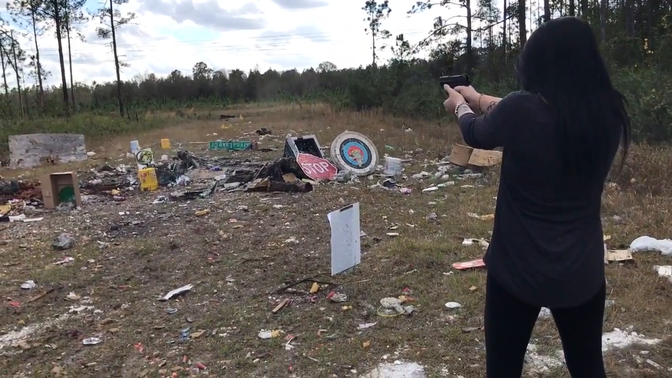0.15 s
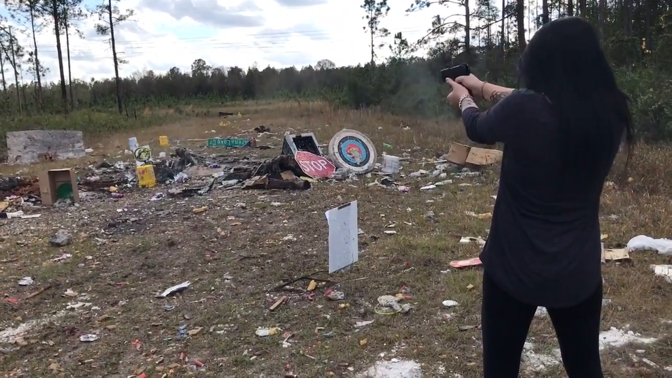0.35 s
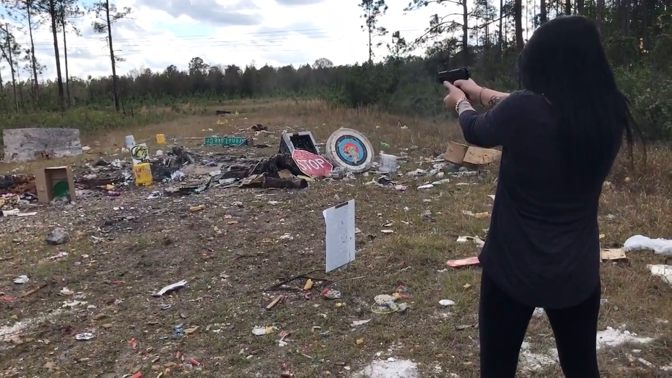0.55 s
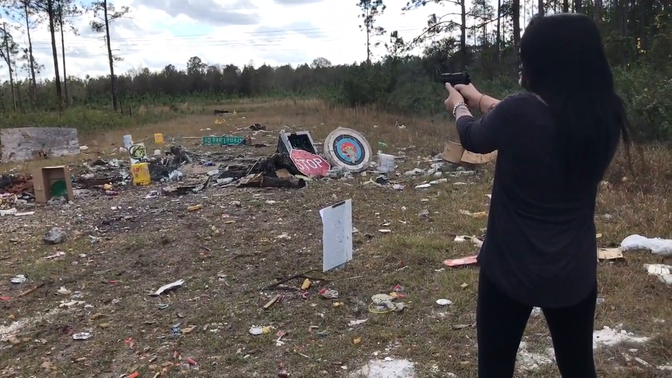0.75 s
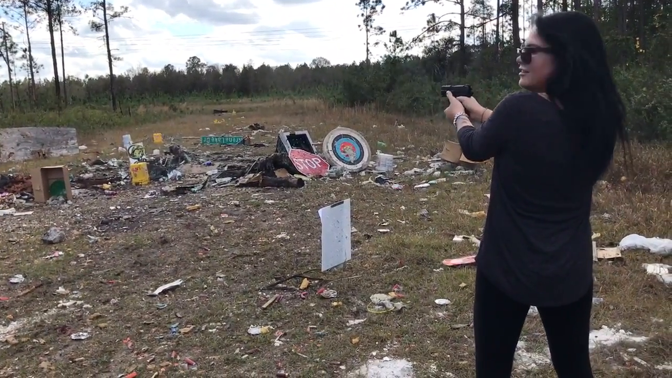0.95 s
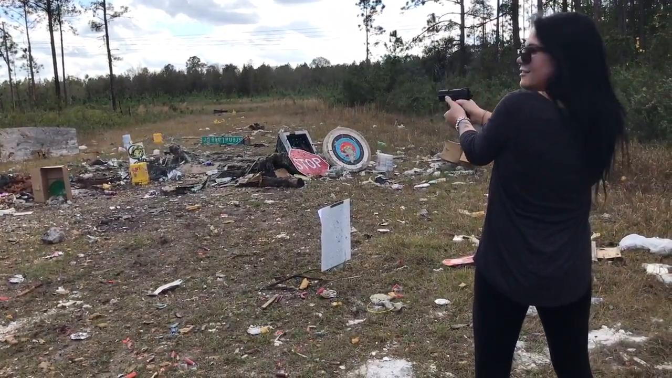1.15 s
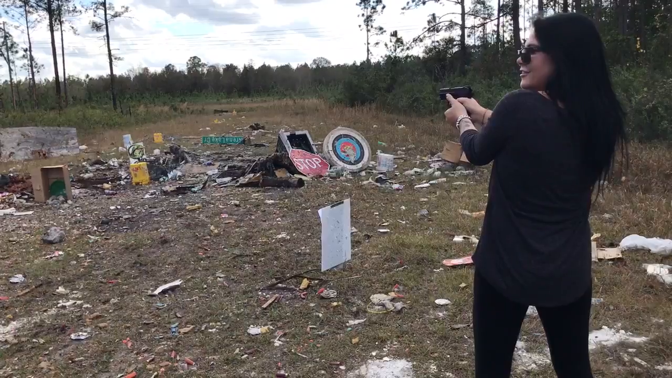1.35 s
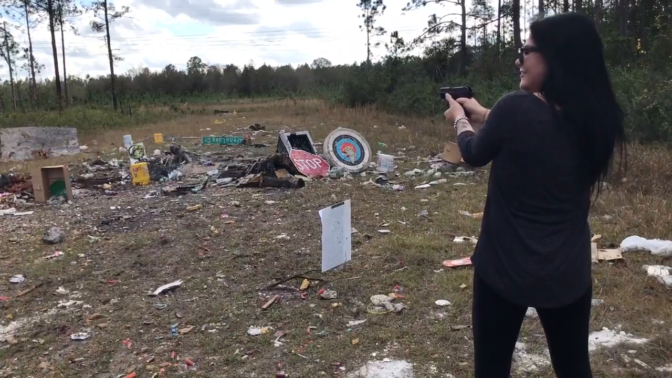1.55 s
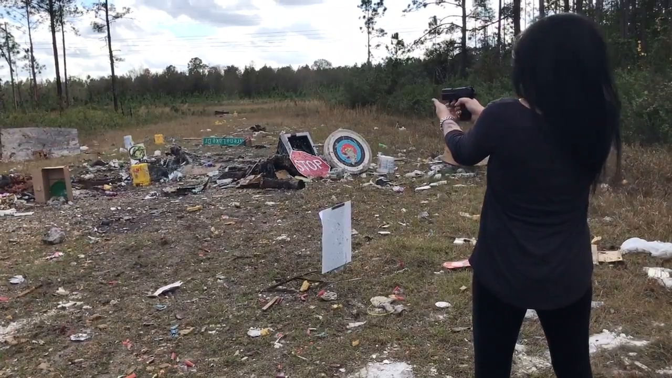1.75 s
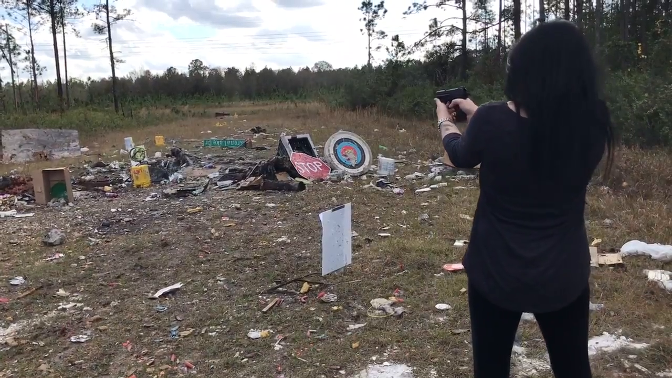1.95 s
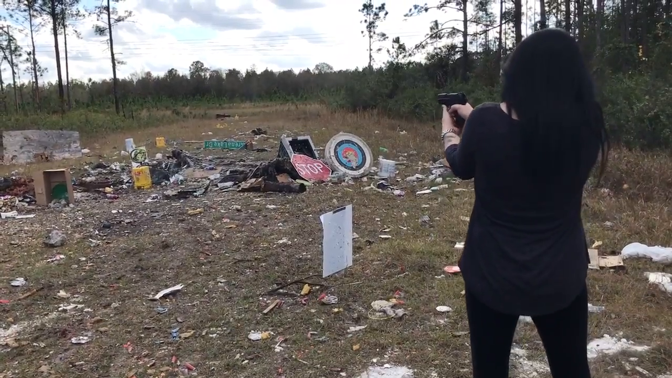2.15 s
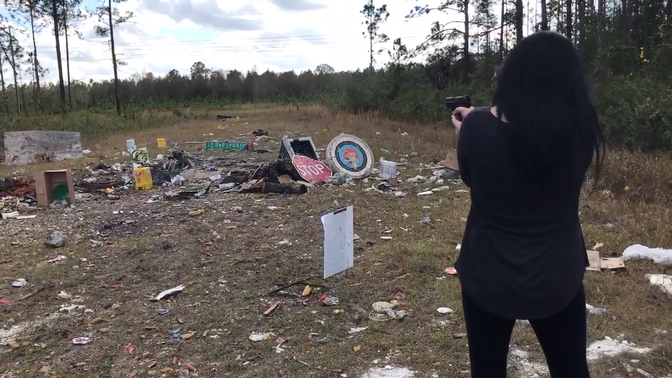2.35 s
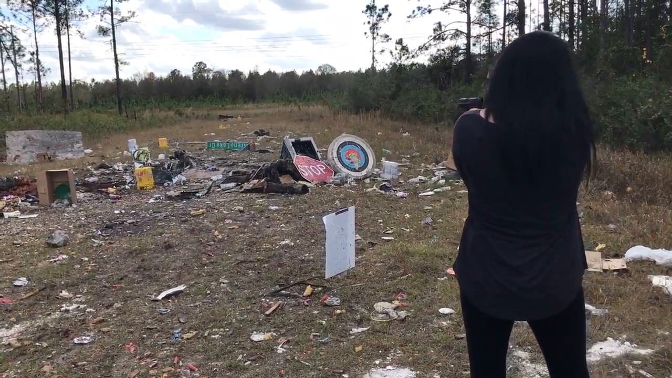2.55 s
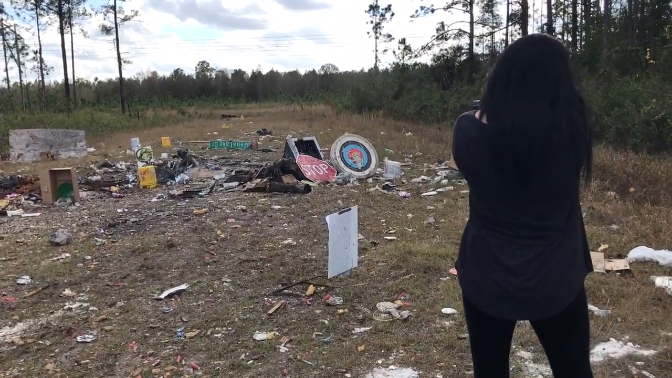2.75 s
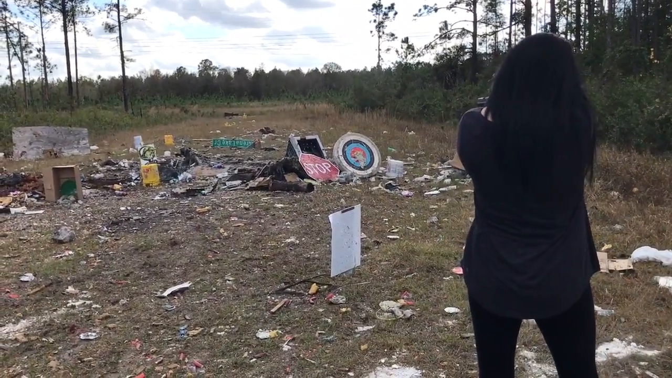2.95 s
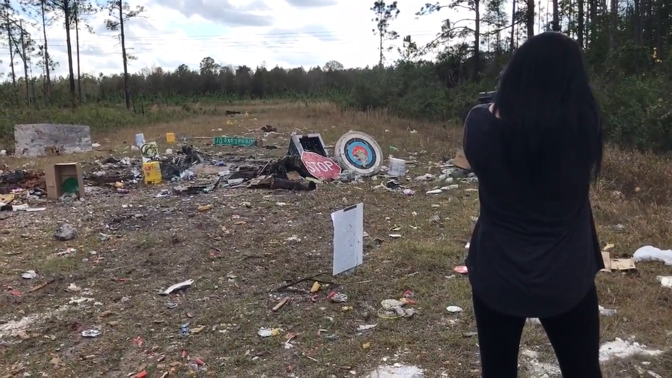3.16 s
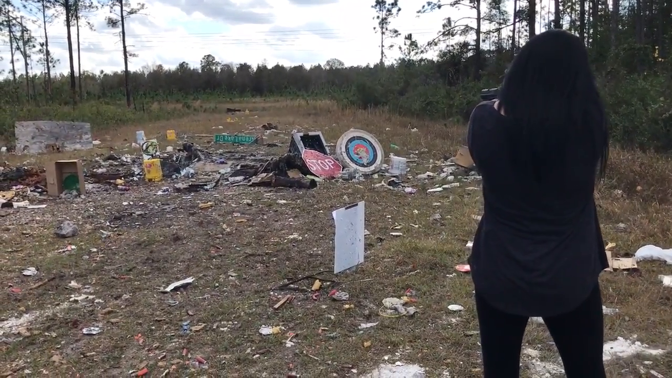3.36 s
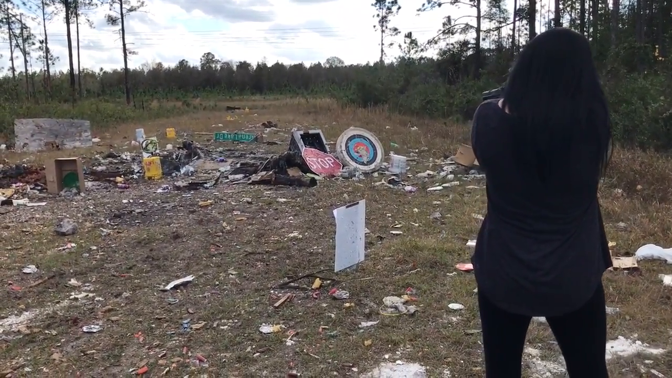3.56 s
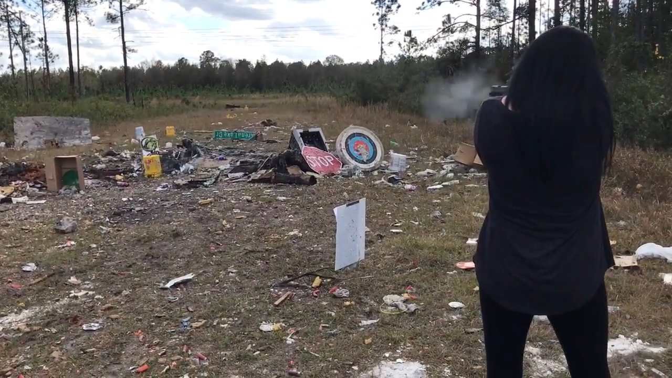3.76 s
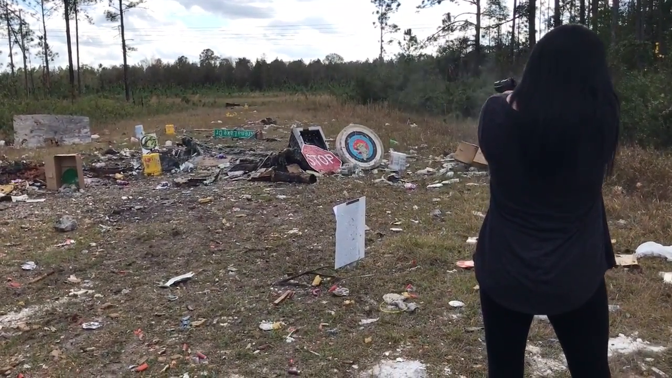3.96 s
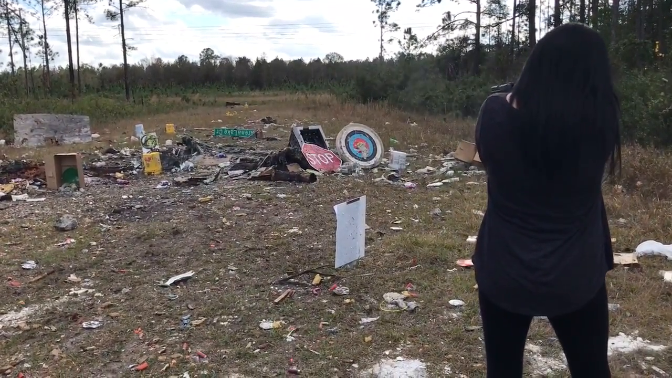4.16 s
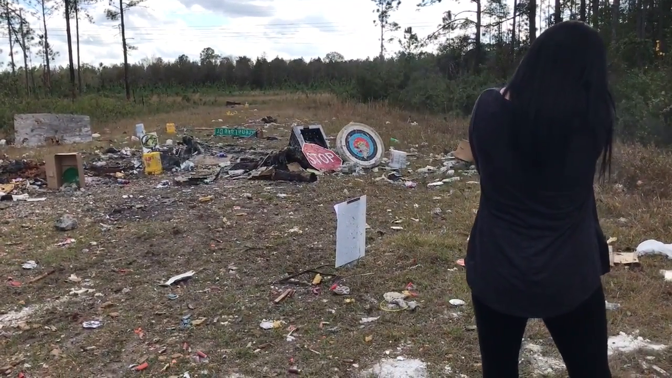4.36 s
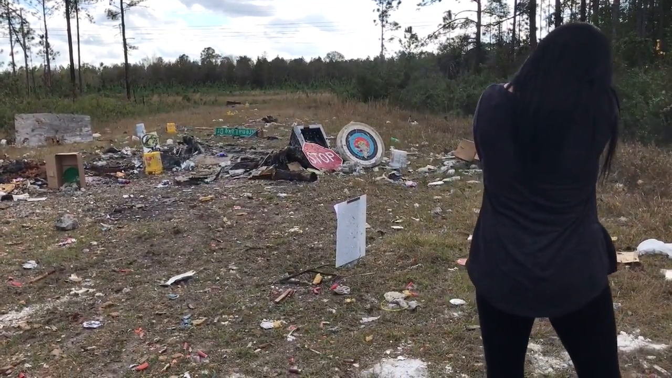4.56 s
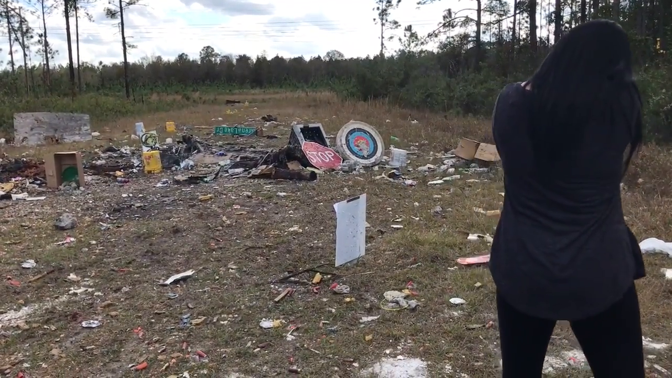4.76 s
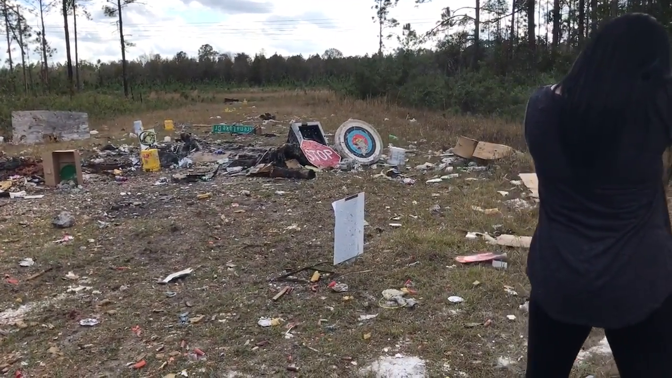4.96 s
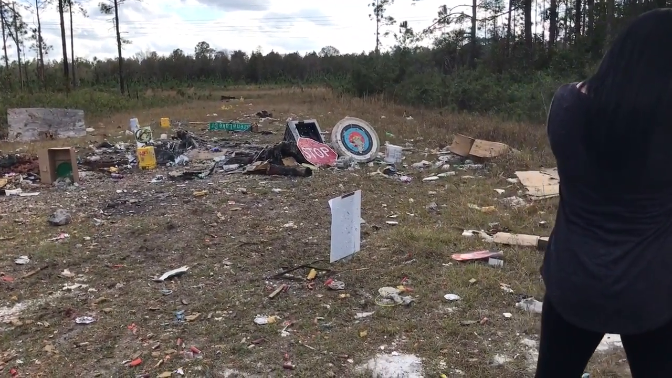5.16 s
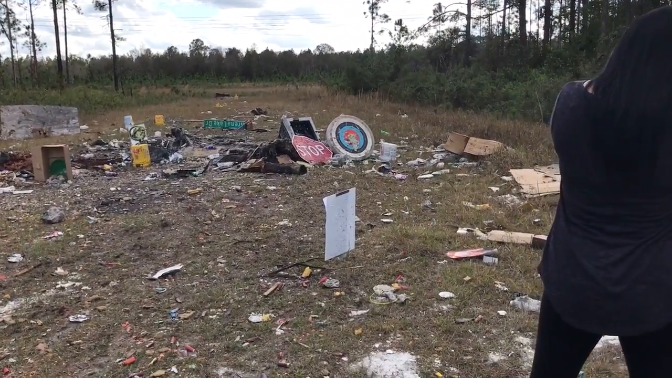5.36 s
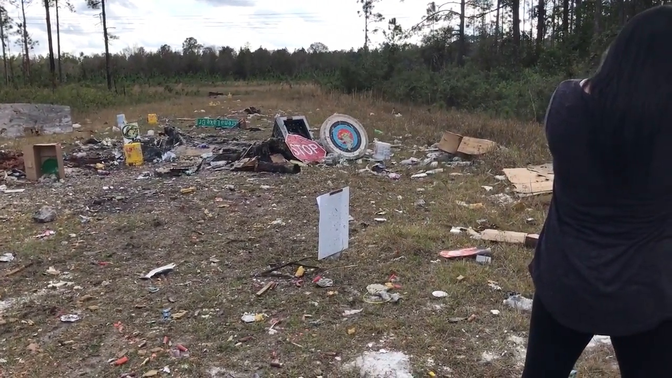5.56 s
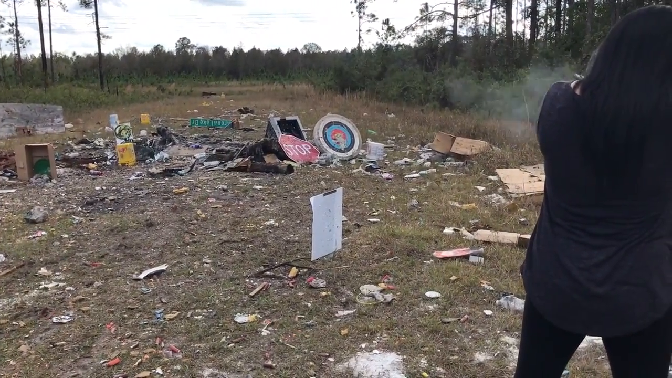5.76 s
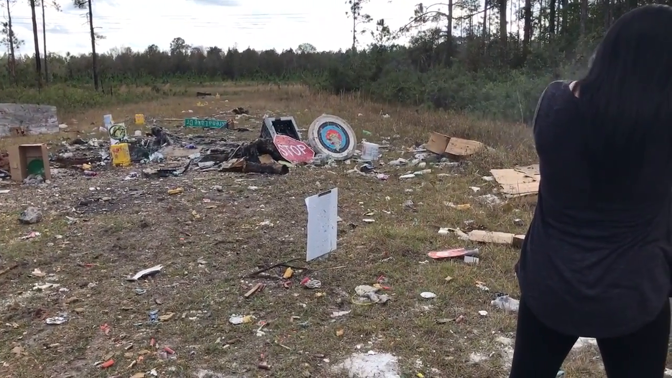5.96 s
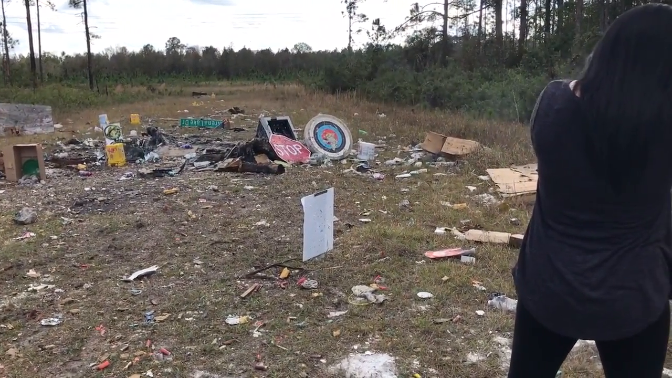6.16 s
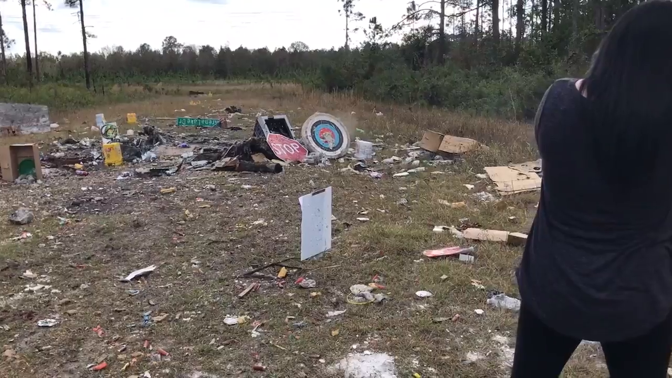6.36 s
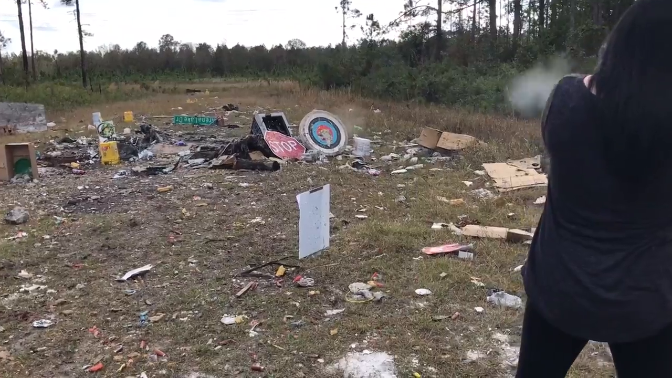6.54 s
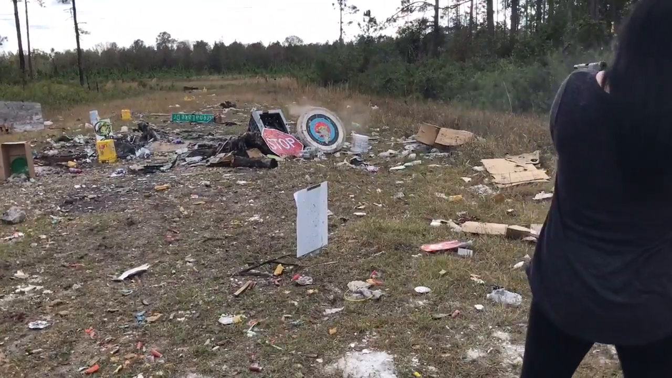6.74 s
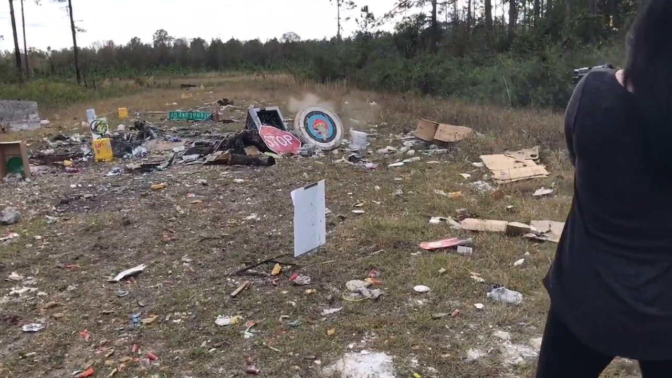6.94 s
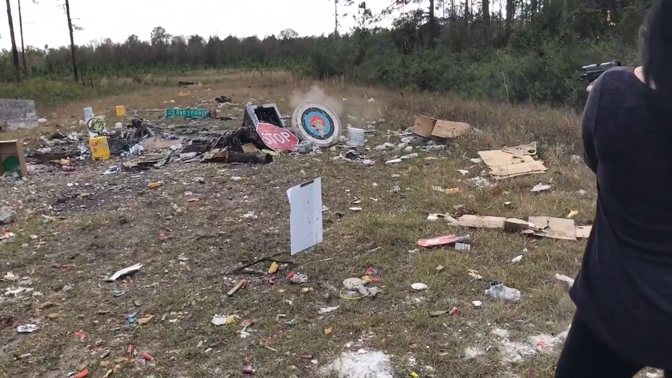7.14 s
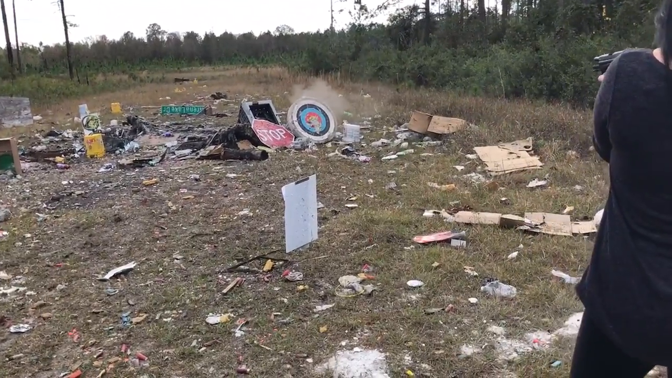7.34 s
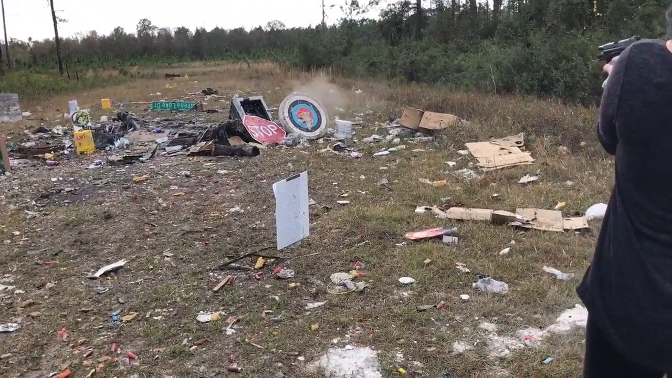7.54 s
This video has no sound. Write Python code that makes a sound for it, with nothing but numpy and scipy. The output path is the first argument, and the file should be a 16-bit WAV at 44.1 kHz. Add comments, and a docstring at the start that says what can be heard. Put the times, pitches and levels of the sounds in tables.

```python
"""An earlier shot is still rolling through breezy forest air when the first of four close pistol shots breaks in.
Each shot layers noise bursts, a resonant roar and a low sine thump, loud enough to overload the microphone.
The same nearby trunks slap it back as filtered spikes; brush, forest edge and pines follow as shaped noise.
Another gun knocks twice far off, a filtered noise burst and a soft thump with a fainter rolling echo.
Ringing clicks, crackly noise rustles and an insect's sagging sine trills fill the pauses."""
import sys
import numpy as np
from scipy import signal
from scipy.fft import rfft, irfft, next_fast_len
from scipy.io import wavfile
from scipy.ndimage import map_coordinates

SR = 44100
rng = np.random.default_rng(int(sys.argv[2]) if len(sys.argv) > 2 else 0)


def pcm_store(signal):
    """Save signal as 16-bit PCM."""
    levels = np.round(np.clip(np.atleast_2d(signal), -1, 1) * 32767)
    wavfile.write(sys.argv[1], SR, levels.astype(np.int16).T)


N = 335151
T = np.arange(3 * SR) / SR  # seconds since an event

# Outdoor air, spectrum: f/Hz, relative level/dB
AIR_SPECTRUM = [(20, -35), (130, -11), (300, -11.5), (650, 6), (1000, -1), (2000, -17.5), (4000, -31.5),
                (8000, -34.5), (16000, -40.5)]
# Breeze on the microphone, pause by pause: t/s, level/dB
BREEZE_LEVELS = [
    [(0.0, -66), (0.168, -66), (0.25, -63)],
    [(0.6, -71), (0.63, -73), (3.75, -64)],
    [(4.3, -74), (5.616, -68), (5.75, -64)],
    [(6.15, -64), (6.392, -66), (6.6, -64)],
    [(7.0, -67.5), (7.194, -75), (7.6, -68)],
]
# Low rumble of the breeze, spectrum: f/Hz, relative level/dB
BREEZE_SPECTRUM = [(20, -20), (35, -8), (55, -0.5), (110, -3.5), (200, -16), (600, -46.5), (2000, -80)]

# Insect trills: start t/s
TRILL_TIMES = [1.42, 2.12, 2.7, 3.35, 5.28, 5.7]
TRILL_DB, TRILL_S = -75.5, .23
TRILL_TOP_HZ, STROKES_PER_S, STROKE_SAG_HZ = 7950, 48, 1000

# Rustles: start t/s, length/s, level/dB
RUSTLES = [(2.5, 0.73, -81), (4.828, 0.25, -67), (4.979, 0.38, -66), (5.42, .07, -74), (5.583, .2, -75),
           (7.24, .11, -70)]
# Crackle of the rustles, spectrum: f/Hz, relative level/dB
RUSTLE_SPECTRUM = [(500, -3), (4500, 3), (7000, 2), (11000, -1), (16000, -1)]

# Small hard contacts: t/s, level/dB, pitch f/Hz, decay to -60 dB t60/s
CLICKS = [(1.079, -62, 13000, .06), (1.0862, -48, 5060, .03), (1.0868, -65, 14400, .11),
          (2.2501, -55, 4220, .04), (3.495, -66, 7000, .02), (3.56, -65, 4000, 0.017),
          (4.147, -38.5, 10860, 0.017), (4.672, -56, 6000, 0.03), (5.0909, -54, 8000, .025),
          (5.110, -50, 3720, 0.025), (5.1725, -51.5, 7500, .018), (5.62, -63, 4000, .04),
          (6.5707, -57, 6950, .025), (6.616, -62, 6000, .02)]

# Distant gun: t/s, knock level/dB, thump level/dB, echo level/dB
FAR_SHOTS = [(1.585, -17, -34.5, -40), (2.043, -17.5, -41.5, -42.5)]
# Knock of the distant gun, spectrum: f/Hz, relative level/dB
KNOCK_SPECTRUM = [(40, -13.5), (150, -24), (320, 0), (650, 0.5), (900, 0.5), (1250, -22), (2200, -23),
                  (4000, -35), (7000, -54), (15000, -70)]
# Rolling echo of the distant gun, spectrum: f/Hz, relative level/dB
FAR_ECHO_SPECTRUM = [(40, -15.5), (170, -19.5), (320, 0), (550, 5.5), (850, 3.5), (1200, -6), (2200, -14),
                     (4000, -26), (7000, -54.5), (15000, -75)]
# Woods around the distant gun: delay t/s, level/dB, attack/s, hold/s, fall/(dB per s)
FAR_WOODS = [(0, 4.5, 0.0034, 0.014, 129), (.05, 1.5, 0.087, 0.31, 13.5)]
FAR_SLAP_S, FAR_SLAP_DB = .0945, 16.5  # one trunk answers; peak over the echo level

# Shot before the start, heard as echo only: t/s, echo level/dB
EARLIER_SHOT = (-1.1, -30.5)
# Big trunks that answer every shot: delay t/s, peak level/dB over the shot's echo level
TRUNKS = [(.079, 16), (.0935, 14), (.0965, 12), (.101, 11), (.128, 5), (.163, 5), (.2105, 8.5), (.2235, 11),
          (.2525, 6), (.261, 6.5), (.271, 9), (.2985, 7), (.333, 11), (.363, 5), (.468, 3)]
TRUNK_SCATTER_DB = 1.2  # random spread from shot to shot
# Echo off a trunk, spectrum: f/Hz, relative level/dB
TRUNK_SPECTRUM = [(60, -30.5), (350, -20.5), (600, -2), (850, 2), (1100, -2.5), (1500, -13), (3000, -27),
                  (6000, -36), (16000, -52)]
# Bright brush close by, around the clearing, at the forest edge:
# delay t/s, level/dB, attack/s, hold/s, fall/(dB per s)
BRUSH = [(.01, 2.5, .04, 0.017, 218.5), (.08, -14.5, .04, 0.046, 60), (.205, -15, .007, 0.073, 104)]
# Bright scatter from the brush, spectrum: f/Hz, relative level/dB
BRUSH_SPECTRUM = [(100, -5), (250, -1), (700, -5), (2000, 2.5), (4000, 1.5), (7000, -4.5), (8600, -4.5),
                  (11000, -11), (16000, -16)]
# Near stand, deep woods, far treeline: delay t/s, level/dB, attack/s, hold/s, fall/(dB per s)
WOODS = [(0, -3, .07, 0.081, 258), (.25, -9.5, .15, .5, 9), (.74, -11.5, .06, 0.11, 30.5)]
# Forest edge, an abrupt answer: delay t/s, level/dB, attack/s, hold/s, fall/(dB per s)
FOREST_EDGE = (.205, -3, .008, .145, 58)
# Echo from the trees, spectrum: f/Hz, relative level/dB
TREES_SPECTRUM = [(40, -32), (200, -18.5), (400, -11.5), (550, -3.5), (720, 2.5), (1000, 3), (1400, -6),
                  (2000, -7.5), (3500, -11), (7000, -16.5), (14000, -28)]

# Pistol shots: t/s, blast level/dB, thump level/dB, thump f/Hz, bark level/dB, first crack level/dB,
# second crack level/dB, echo level/dB, brush level/dB, extra delay of the trunk echoes/s
SHOTS = [(0.3081, -13, -16, 49.94, -12, -20, -23.5, -35, -34, 0.0018),
         (3.8848, -11.5, -18.5, 58.2, -8.5, -15.5, -9, -32, -29.5, 0),
         (5.8693, -13, -11, 55.8, -22.5, -12.5, -21, -32.5, -35, 0.00072),
         (6.672, -12.5, -18, 54, -52, -24, -26.5, -34.5, -37.5, .0005)]
# Muzzle blast, spectrum: f/Hz, relative level/dB
BLAST_SPECTRUM = [(35, -17), (60, -4), (98, -3), (425, -10), (727, -4.5), (1460, -10), (1980, -13),
                  (2950, -15), (3310, -15), (4090, -13), (4920, -19.5), (6070, -16.5), (7900, -22.5),
                  (9400, -21), (12800, -22), (15800, -27)]
# Resonances that the blast rings: f/Hz, mean level/dB, decay to -60 dB t60/s
BLAST_RINGS = [(275, -2.5, 0.098), (687, -1.5, 0.099), (2950, -10.5, 0.14), (3920, -9.5, 0.072)]
BLAST_HOLD_S, BLAST_FALL_DB_PER_S = .021, 469  # holds, then collapses
BLAST_TAIL_DB, BLAST_TAIL_DB_PER_S = -8, 184  # slower tail underneath
# Sharp cracks, spectrum: f/Hz, relative level/dB
CRACK_SPECTRUM = [(100, -10.5), (400, 3), (900, -1.5), (2000, -8.5), (5000, -9.5), (9000, -13.5),
                  (16000, -18)]
# Noise in the bark, spectrum: f/Hz, relative level/dB
BARK_SPECTRUM = [(60, -21), (250, 8), (500, -6), (850, 3), (1150, -2.5), (1400, -8.5), (1700, -5.5),
                 (2200, -26), (3100, -16), (4000, -40), (16000, -46)]
# Tones in the bark: f/Hz, level/dB, decay to -60 dB t60/s
BARK_RINGS = [(930, -4.5, .09), (1780, -14.5, .06), (3020, -19.5, 0.055)]
SNAP_LEAD_S, SNAP_DB, BARK_LEAD_S = .0225, -17.5, .011  # ahead of the blast; snap relative to it
FIRST_CRACK_S, SECOND_CRACK_S = .051, .1005  # after every blast
# Low boom heard once, with a second crack: t/s, level/dB
BOOM = (3.985, -8)

NOTCH_HZ, NOTCH_WIDTH_HZ, NOTCH_DB = 10480, 260, -5.5  # dip in the microphone's treble
TOP_HZ = 15800  # band limit


def amp(db):
    """Decibels to gain."""
    return 10 ** (np.asarray(db) / 20)


def unit(x):
    """Scale to rms 1."""
    return x / np.sqrt(np.mean(x ** 2) + 1e-20)


def level(rows, t):
    """Gain along (t/s, level/dB) points."""
    return amp(np.interp(t, *np.transpose(rows)))


def add(track, s, sound):
    """Mix a sound into the track at time s, trimmed to the track's ends."""
    start = round(s * SR)
    part = sound[max(-start, 0):N - start]
    track[max(start, 0):][:len(part)] += part


def coloured(x, spectrum, size=4096):
    """Minimum-phase filter of unit energy through (f/Hz, level/dB) points: nothing rings ahead of its cause."""
    points_hz, db = np.transpose(spectrum)
    hz = np.fft.rfftfreq(size, 1 / SR)
    curve_db = np.interp(np.log(hz + 1), np.log(points_hz), db)
    cepstrum = irfft(np.log(amp(curve_db)))
    # folding the cepstrum forward makes the filter causal
    cepstrum[1:size // 2] *= 2
    cepstrum[size // 2 + 1:] = 0
    response = irfft(np.exp(rfft(cepstrum)))
    return signal.oaconvolve(x, response / np.linalg.norm(response))[:len(x)]


def wobble(rate, count):
    """A smooth random curve with rate knots a second."""
    knots = rng.standard_normal(8192)
    return map_coordinates(knots, [np.arange(count) * rate / SR], order=2, mode="wrap")


def envelope(t, attack, hold, fall):
    """A smooth rise, a hold, then a fall in dB per second."""
    rise = np.sin(np.pi / 2 * np.clip(t / attack, 0, 1)) ** 2
    return rise * amp(-fall * np.maximum(t - attack - hold, 0))


def burst(t60):
    """A quarter second of noise that decays 60 dB in t60 seconds."""
    t = T[:SR // 4]
    return rng.standard_normal(len(t)) * amp(-60 * t / t60)


def ping(spectrum):
    """One pressure spike through a spectrum, with peak 1."""
    sound = coloured(signal.unit_impulse(SR // 10), spectrum)
    return sound / np.abs(sound).max()


def thump(hz, attack, fall):
    """A low pressure swing that swells and dies within a few cycles."""
    t = T[:SR // 4]
    return np.sin(2 * np.pi * hz * t) * envelope(t, attack, 0, fall)


def returns(belts):
    """Gain of the echo after a shot: the belts of vegetation add in power."""
    power = 0
    for delay, db, attack, hold, fall in belts:
        power = power + (amp(db) * envelope(T - delay, attack, hold, fall)) ** 2
    return np.sqrt(power)


def forest(belts, spectrum, spiky_db, patchy_db, trunk_db, loss_db=1.91, slope=1.43):
    """Countless small echoes and scattered strong ones; the later they come, the more treble the air has taken."""
    spikes = amp(spiky_db * rng.standard_normal(len(T)).clip(-3, 3))
    small = unit(rng.standard_normal(len(T)) * spikes)
    hits = rng.random(len(T)) < 110 / SR  # about 110 strong echoes a second
    strong = unit(rng.standard_normal(len(T)) * hits)
    gain = returns(belts) * amp(patchy_db * wobble(70, len(T)))
    blur = amp(trunk_db - 16 * T)  # over long paths the strong echoes melt into the rest
    reflections = coloured(small * gain, spectrum) + coloured(strong * gain * blur, TRUNK_SPECTRUM)
    hz, t, z = signal.stft(reflections, SR, nperseg=256)
    khz = hz[:, None] / 1000
    air_loss = amp(-loss_db * khz ** slope * t)
    return signal.istft(z * air_loss, SR, nperseg=256)[1][:len(T)]


def clearing():
    """Soft outdoor air and a light, rumbling breeze on the microphone, both as gently wavering noise."""
    air = amp(-53.5) * coloured(rng.standard_normal(N), AIR_SPECTRUM) * amp(wobble(4, N))
    rumble = coloured(rng.standard_normal(N), BREEZE_SPECTRUM) * amp(2.8 * wobble(7.7, N))
    breeze = level(np.concatenate(BREEZE_LEVELS), np.arange(N) / SR) * rumble
    return air + breeze


def insect():
    """Short high trills; each wing stroke swells and sags in pitch."""
    out = np.zeros(N)
    t = T[:round(TRILL_S * SR)]
    stroke = (STROKES_PER_S * t) % 1
    swell = np.sin(np.pi * stroke) ** 2 * np.hanning(len(t)) ** .5
    for s in TRILL_TIMES:
        pitch = TRILL_TOP_HZ - STROKE_SAG_HZ * stroke + 160 * wobble(900, len(t))
        tone = np.sin(2 * np.pi * np.cumsum(pitch) / SR)
        add(out, s, amp(TRILL_DB) * tone * swell)
    return out


def rustle():
    """Faint crackly rustles: unevenly grained noise that swells and fades."""
    out = np.zeros(N)
    for s, length, db in RUSTLES:
        count = round(length * SR)
        crackle = amp(4 * wobble(304, count) + 2.3 * wobble(71, count))
        grains = unit(rng.standard_normal(count) * crackle)
        add(out, s, amp(db) * grains * np.hanning(count) ** .5)
    return coloured(out, RUSTLE_SPECTRUM)


def clicks():
    """Small hard contacts: a tick that is brightest near its pitch, and a short ring."""
    out = np.zeros(N)
    for s, db, hz, t60 in CLICKS:
        tick = coloured(burst(t60), [(hz / 4, -10), (hz, 0), (hz * 3, -16)])
        t = T[:len(tick)]
        ring = wobble(900, len(t)) * np.sin(2 * np.pi * hz * t) * amp(-60 * t / t60)
        add(out, s, amp(db) * (0.85 * tick + 0.9 * ring))
    return out


def far_gun():
    """A dull knock with one slap-back, then a fainter rolling echo."""
    out = np.zeros(N)
    for s, db, thump_db, echo_db in FAR_SHOTS:
        add(out, s, amp(db) * coloured(burst(t60=0.036), KNOCK_SPECTRUM))
        add(out, s + FAR_SLAP_S, amp(echo_db + FAR_SLAP_DB) * ping(KNOCK_SPECTRUM))
        add(out, s, amp(thump_db) * thump(hz=62, attack=.01, fall=400))
        roll = forest(FAR_WOODS, FAR_ECHO_SPECTRUM, spiky_db=5.5, patchy_db=1.15, trunk_db=-18, loss_db=1.5)
        add(out, s, amp(echo_db) * roll)
    return out


def slap(scatter_db):
    """The echo from one trunk: a spike with a brief scatter from its branches."""
    spike = ping(TRUNK_SPECTRUM)
    scatter = coloured(burst(t60=0.028), TRUNK_SPECTRUM)[:len(spike)]
    return spike + amp(scatter_db) * scatter


def echoes():
    """The same trunks, brush and woods answer every pistol shot; an earlier shot is still rolling away."""
    out = np.zeros(N)
    for s, *_, echo_db, brush_db, trunk_lag in SHOTS:
        for delay, db in TRUNKS:
            slap_db = echo_db + db + rng.normal(0, TRUNK_SCATTER_DB)
            add(out, s + trunk_lag + delay, amp(slap_db) * slap(scatter_db=-11.5))
        scatter = coloured(rng.standard_normal(len(T)) * returns(BRUSH), BRUSH_SPECTRUM)
        add(out, s, amp(brush_db) * scatter)
        roll = forest([*WOODS, FOREST_EDGE], TREES_SPECTRUM, spiky_db=5.0, patchy_db=0.62, trunk_db=-7)
        add(out, s, amp(echo_db) * roll)
    s, echo_db = EARLIER_SHOT
    roll = forest(WOODS, TREES_SPECTRUM, spiky_db=4.5, patchy_db=-0.55, trunk_db=-6.0)
    add(out, s, amp(echo_db) * roll)
    return out


def bark(attack):
    """The hollow opening of a shot: low noise with a few ringing tones."""
    t = T[:SR // 4]
    sound = amp(-1) * coloured(burst(t60=.13), BARK_SPECTRUM)
    for hz, db, t60 in BARK_RINGS:
        phase = 2 * np.pi * hz * t + .5 * wobble(150, len(t))
        sound += amp(db - 60 * t / t60) * np.sin(phase)
    return sound * (1 - np.exp(-t / attack))


def blast(ragged_db, spiky_db):
    """The muzzle blast: a bright, uneven roar that holds briefly and collapses, with a few short resonances."""
    t = T[:SR // 2]
    cracks = amp(ragged_db * wobble(450, len(t)) + spiky_db * wobble(4000, len(t)))
    body = envelope(t, 0.00041, BLAST_HOLD_S, BLAST_FALL_DB_PER_S)
    tail = amp(BLAST_TAIL_DB - BLAST_TAIL_DB_PER_S * t)
    noise = unit(rng.standard_normal(len(t)) * cracks) * np.hypot(body, tail)
    roar = amp(-1.55) * coloured(noise, BLAST_SPECTRUM)
    for hz, db, t60 in BLAST_RINGS:
        phase = 2 * np.pi * hz * t + 1.2 * wobble(150, len(t))
        ring_gain = amp(db + rng.normal(0, 2) - 60 * t / t60)
        roar += ring_gain * np.sin(phase) * (1 - np.exp(-t / .002))
    return roar


def boom(start_hz, end_hz, glide, life):
    """A sudden low boom whose pitch plunges."""
    t = T[:SR // 4]
    pitch = end_hz + (start_hz - end_hz) * np.exp(-t / glide)
    return np.sin(2 * np.pi * np.cumsum(pitch) / SR) * np.exp(-t / life)


def pistol():
    """Each shot opens with a choked snap and a bark; then shock front, blast, thump and two cracks."""
    out = np.zeros(N)
    for s, db, thump_db, thump_hz, bark_db, first_db, second_db, *_ in SHOTS:
        add(out, s - SNAP_LEAD_S, amp(db + SNAP_DB) * coloured(burst(t60=0.075), CRACK_SPECTRUM))
        add(out, s - BARK_LEAD_S, amp(bark_db) * bark(attack=0.00086))
        add(out, s, amp(db + 1.5) * coloured(burst(t60=.016), CRACK_SPECTRUM))  # shock front
        add(out, s, amp(db) * blast(ragged_db=2.5, spiky_db=1.5))
        # the thump starts early, as it swells slowly
        add(out, s - .008, amp(thump_db) * thump(thump_hz, attack=.034, fall=750))
        add(out, s + FIRST_CRACK_S, amp(first_db) * coloured(burst(t60=.065), CRACK_SPECTRUM))
        add(out, s + SECOND_CRACK_S, amp(second_db) * coloured(burst(t60=0.025), CRACK_SPECTRUM))
    s, db = BOOM
    add(out, s, amp(db) * boom(start_hz=400, end_hz=50, glide=0.0021, life=.013))
    return out


def scene():
    """Everything at one microphone."""
    background = clearing() + insect() + rustle() + clicks()
    guns = far_gun() + echoes() + pistol()
    return (background + guns)[None]


def record(dry, top=.64, hardness=4):
    """The microphone dips in the treble and saturates towards top on the blasts; a low-pass sets the band limit."""
    size = next_fast_len(N + 4096)
    hz = np.fft.rfftfreq(size, 1 / SR)
    dip = amp(NOTCH_DB / (1 + ((hz - NOTCH_HZ) / NOTCH_WIDTH_HZ) ** 2))
    heard = irfft(rfft(dry, size) * dip, size)[:, :N]
    squashed = heard / (1 + np.abs(heard / top) ** hardness) ** (1 / hardness)
    lowpass = signal.firwin(401, TOP_HZ, fs=SR, window="blackman")
    return signal.oaconvolve(squashed, lowpass[None], mode="same", axes=1)


dry = scene()
out = record(dry)
pcm_store(out)
```